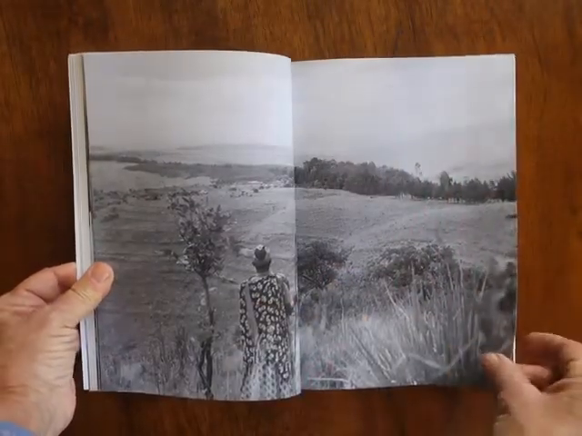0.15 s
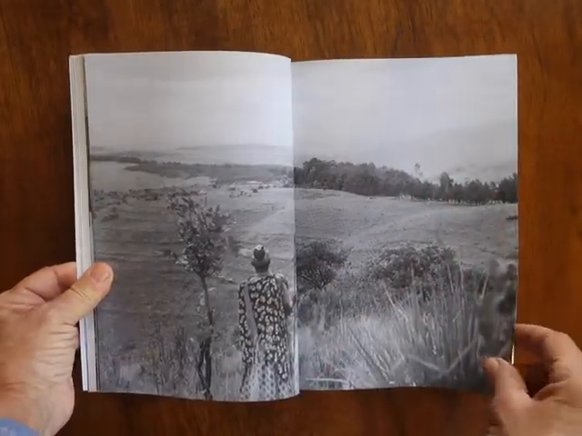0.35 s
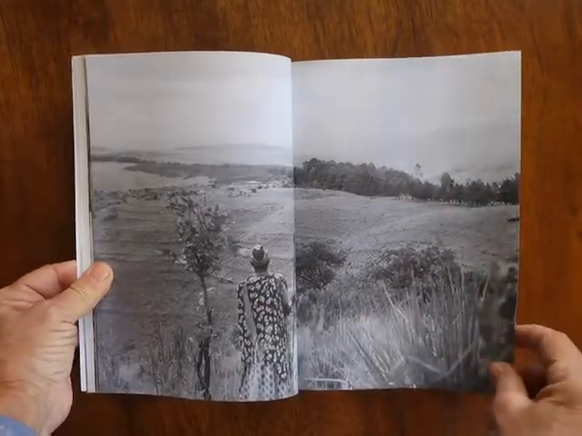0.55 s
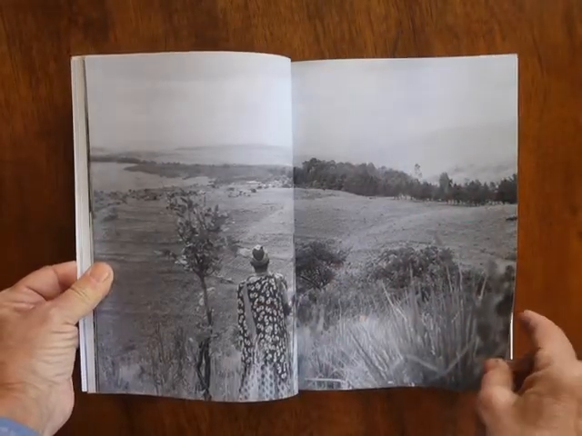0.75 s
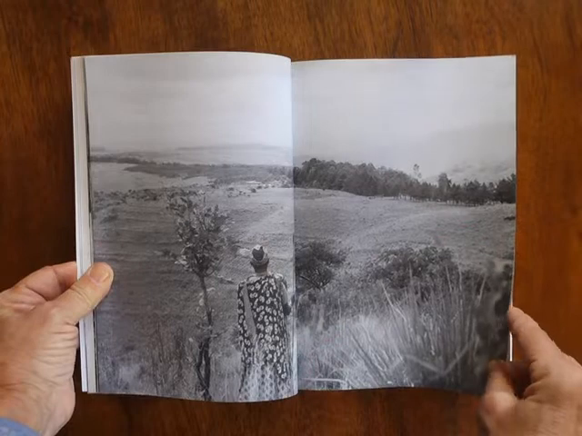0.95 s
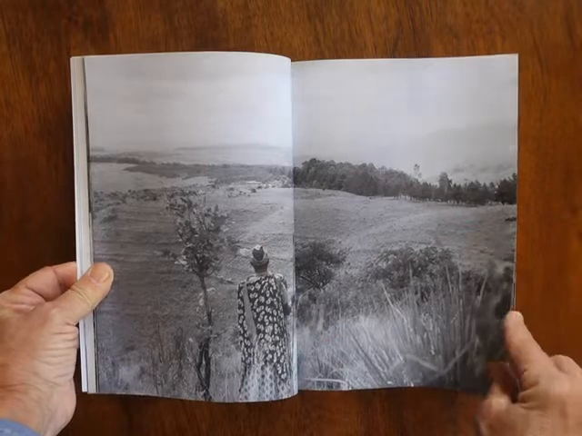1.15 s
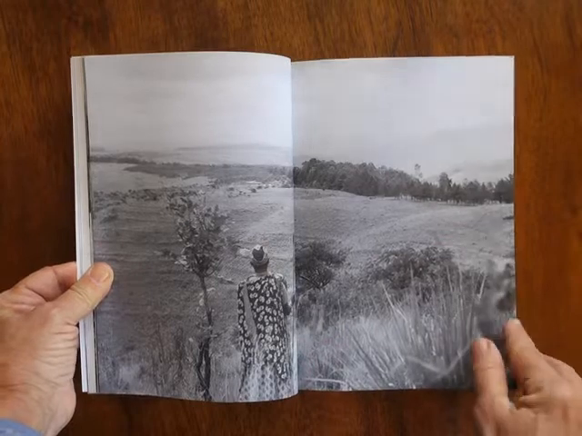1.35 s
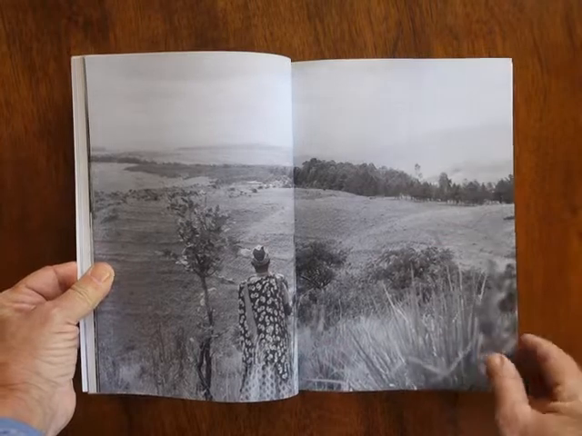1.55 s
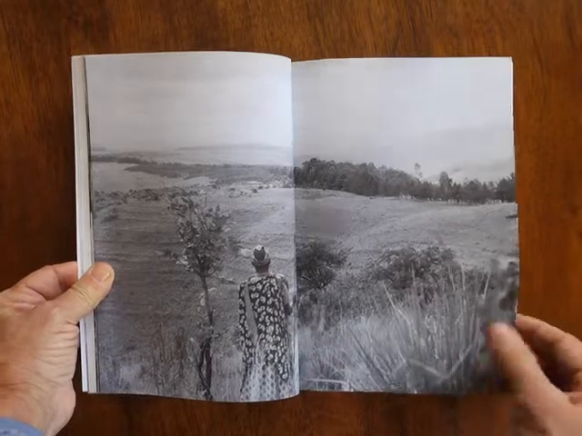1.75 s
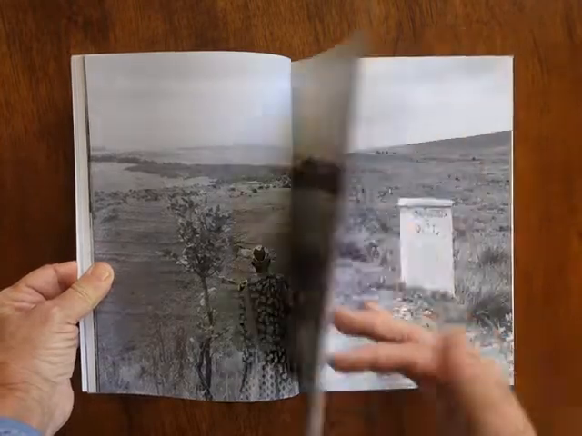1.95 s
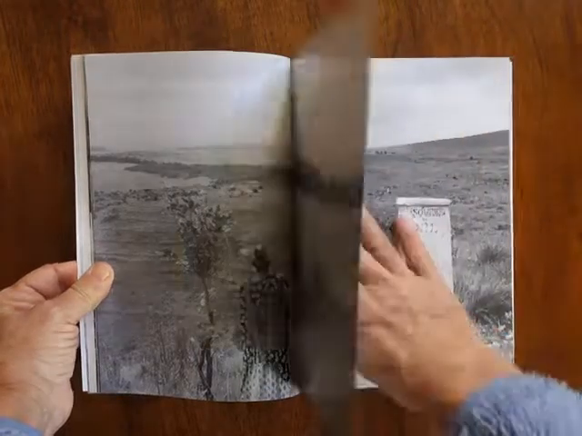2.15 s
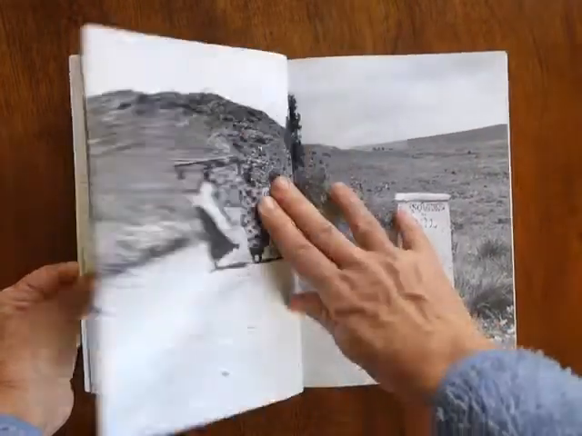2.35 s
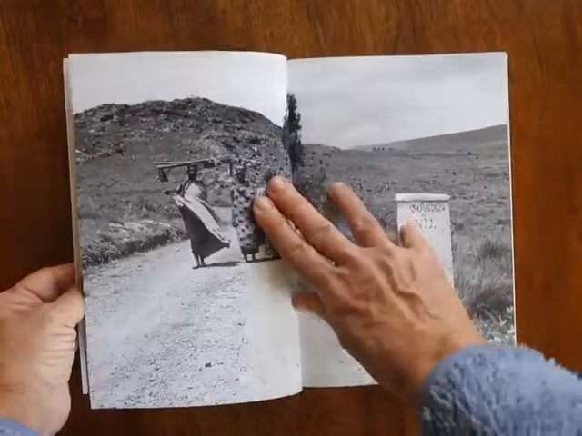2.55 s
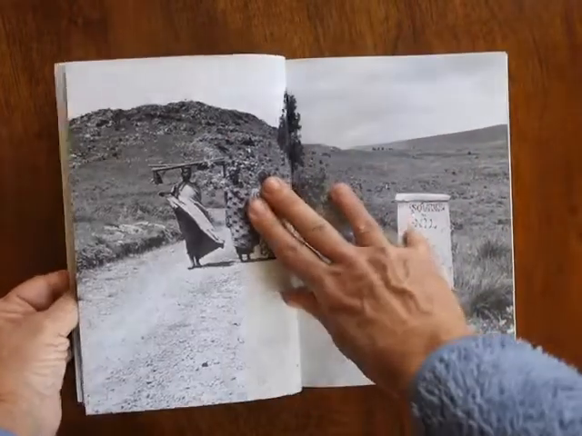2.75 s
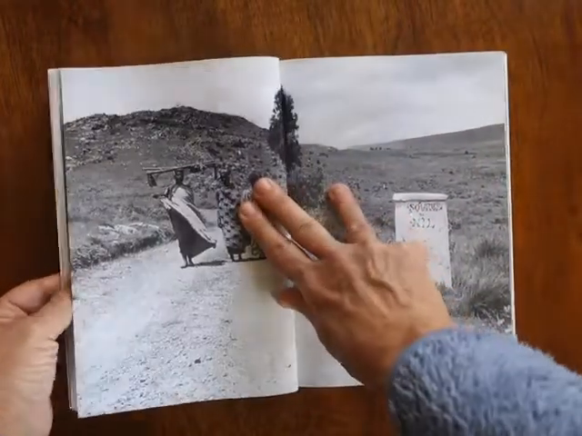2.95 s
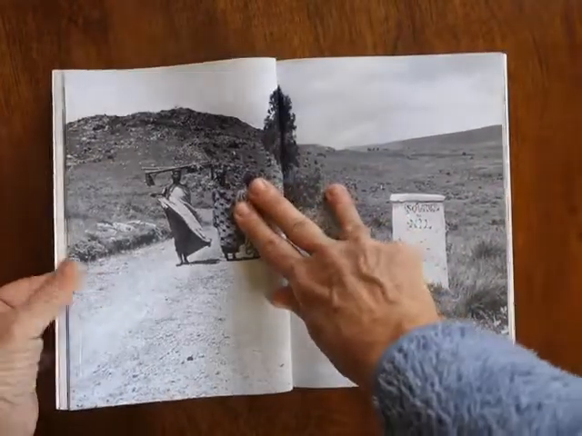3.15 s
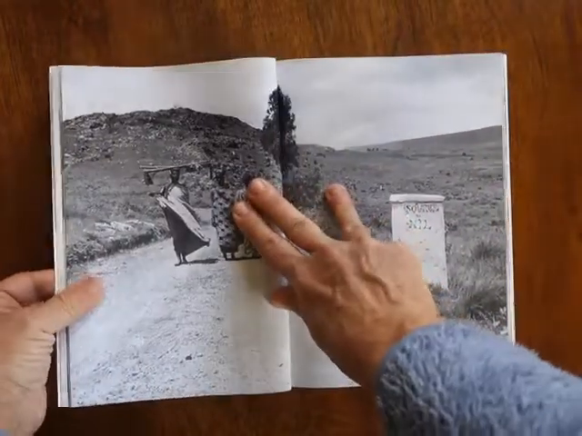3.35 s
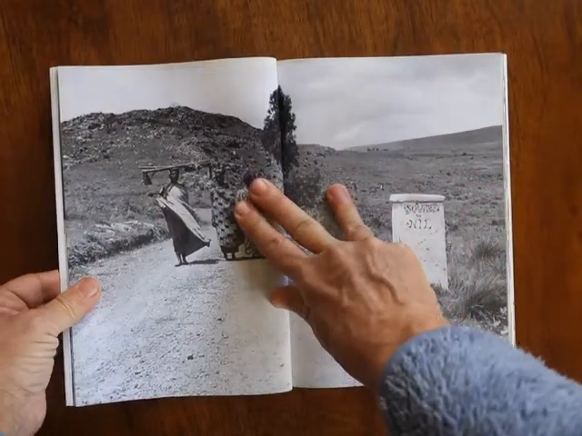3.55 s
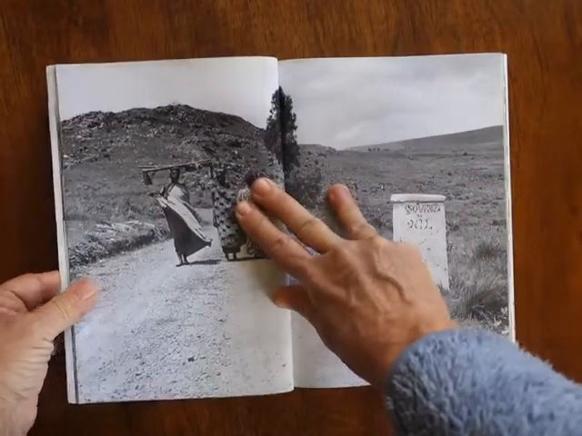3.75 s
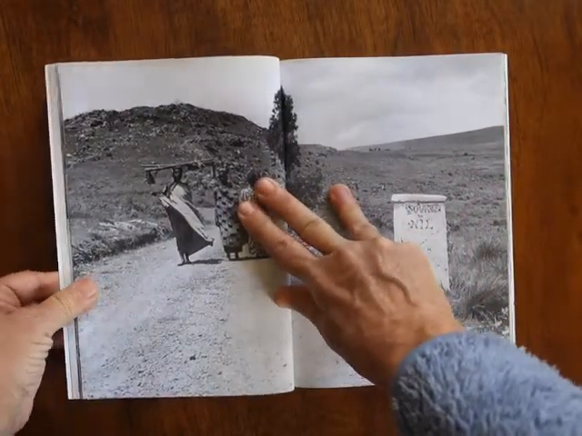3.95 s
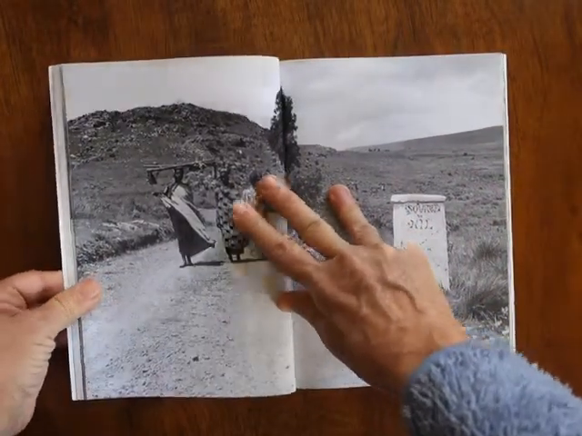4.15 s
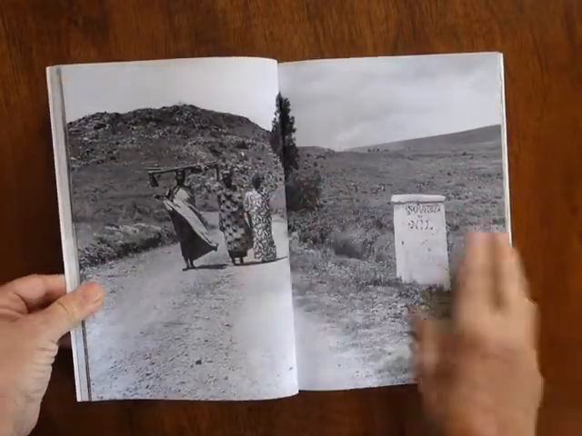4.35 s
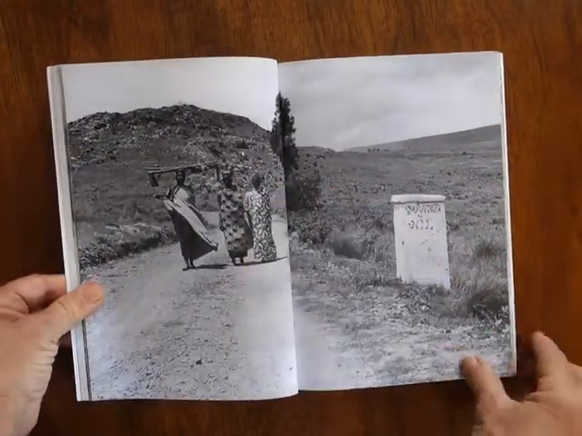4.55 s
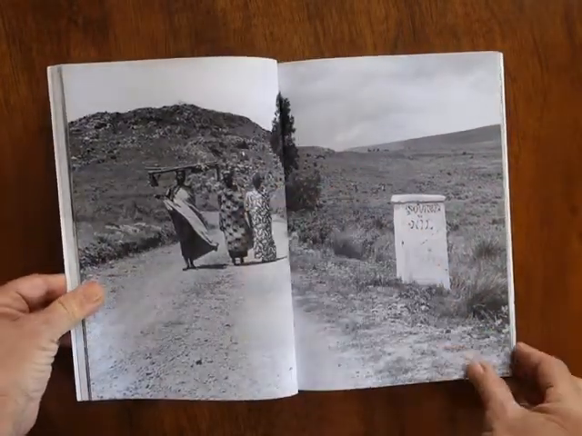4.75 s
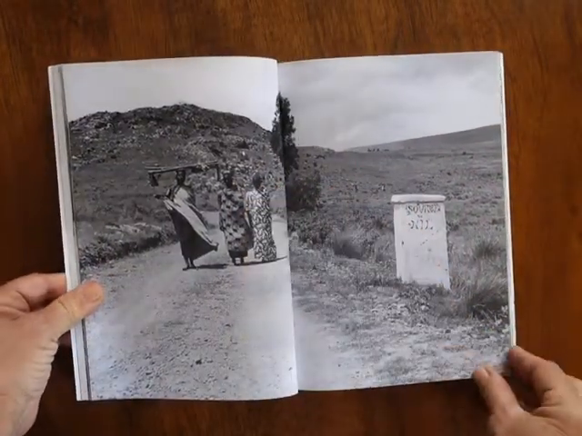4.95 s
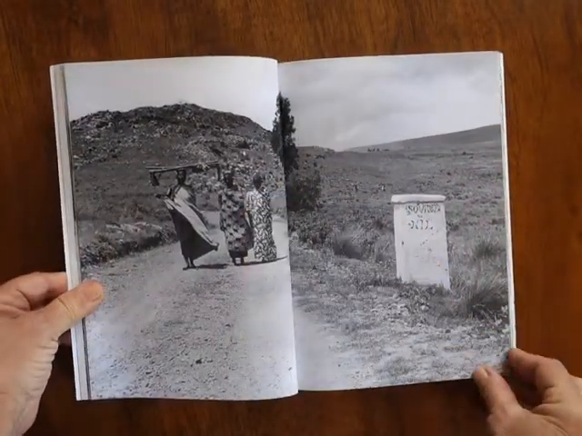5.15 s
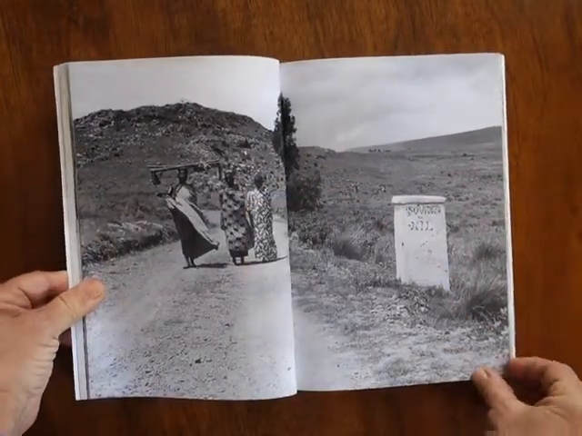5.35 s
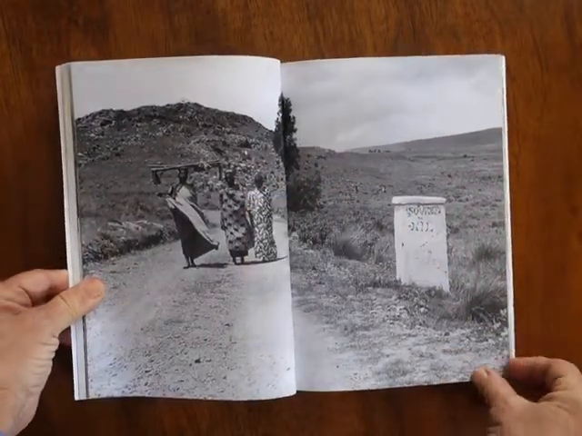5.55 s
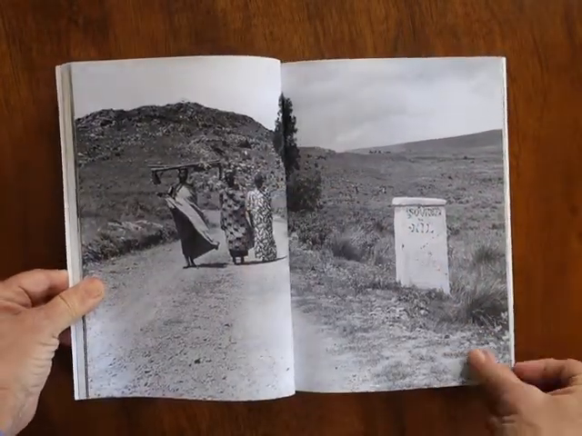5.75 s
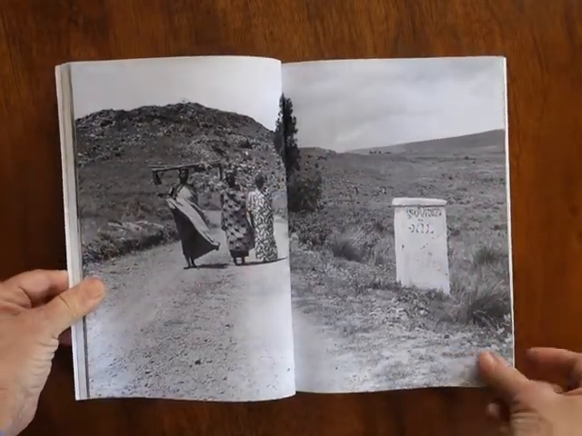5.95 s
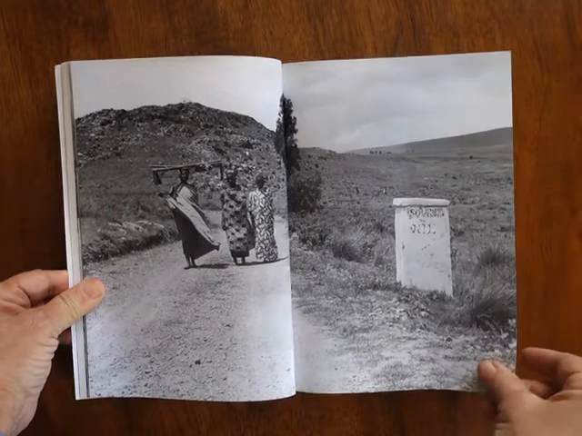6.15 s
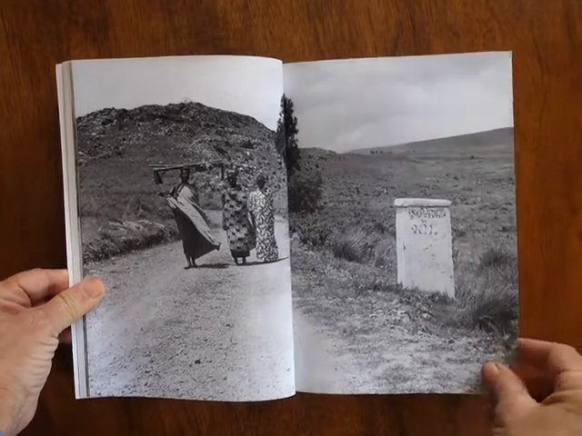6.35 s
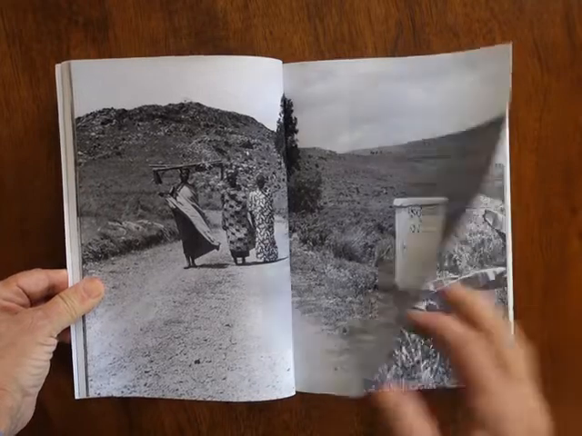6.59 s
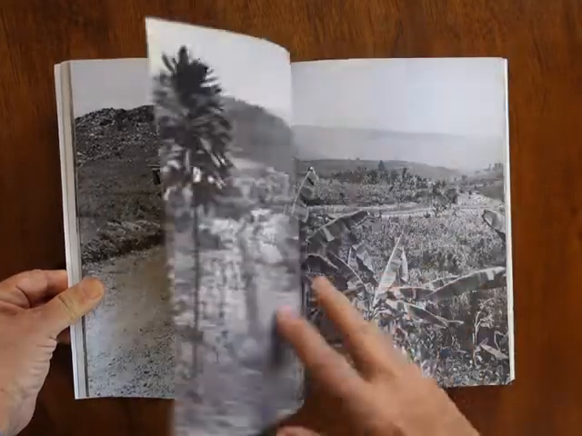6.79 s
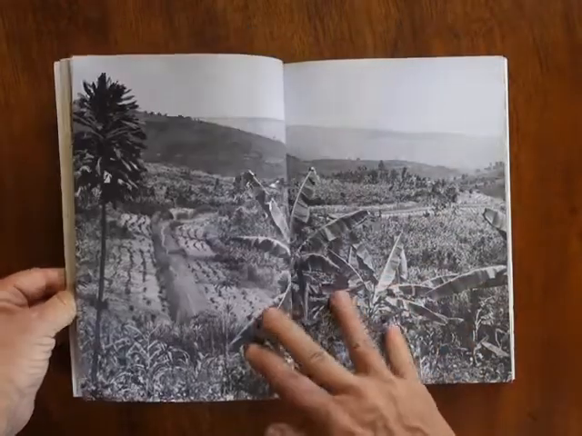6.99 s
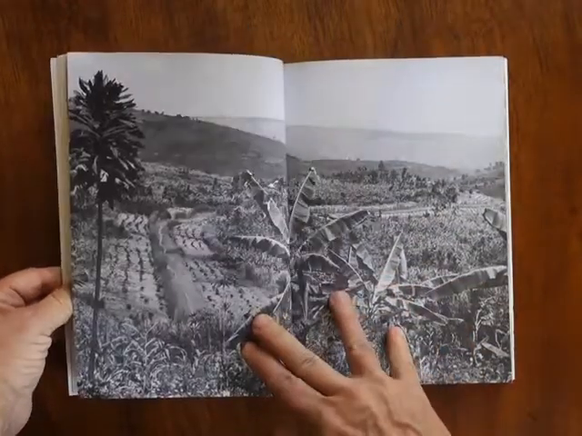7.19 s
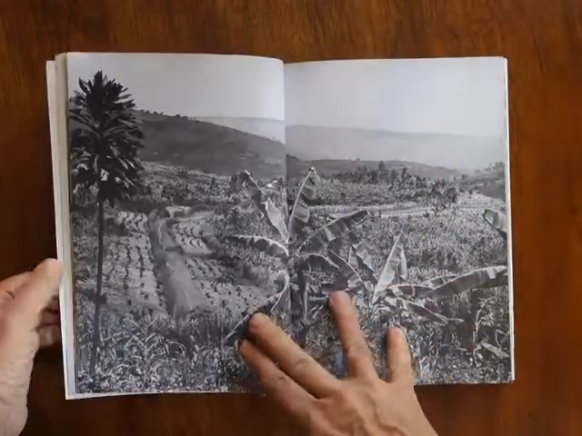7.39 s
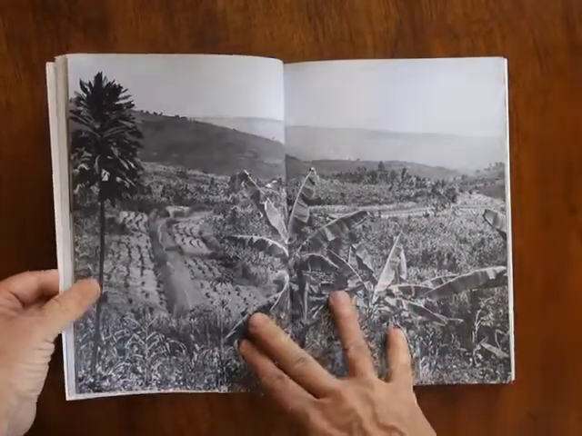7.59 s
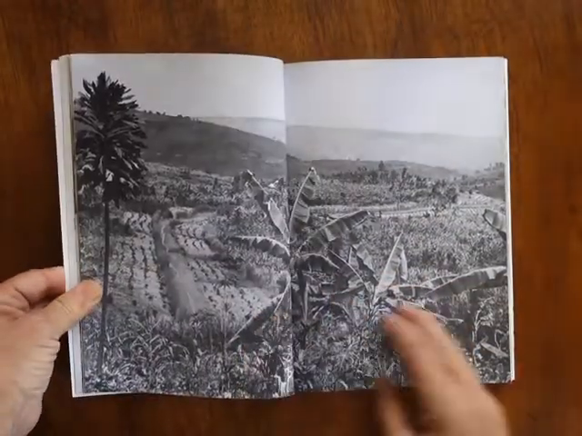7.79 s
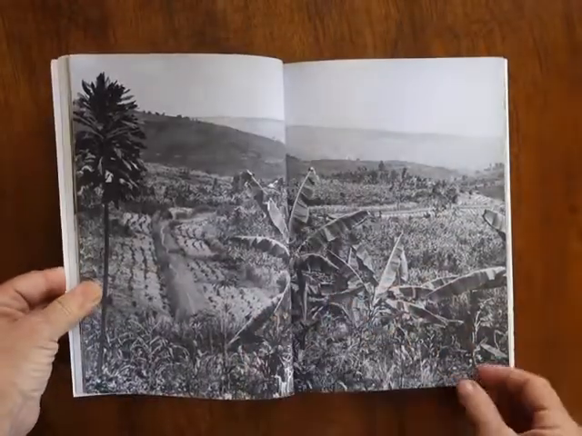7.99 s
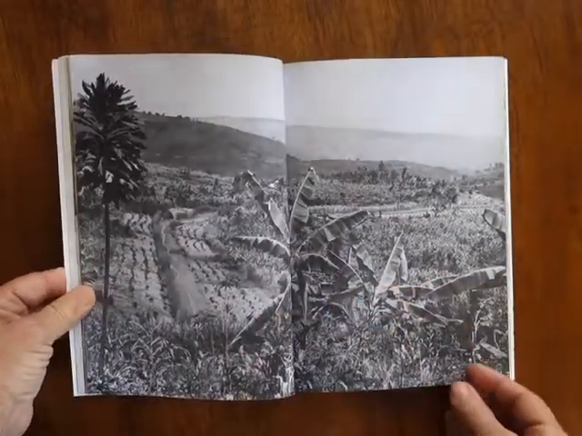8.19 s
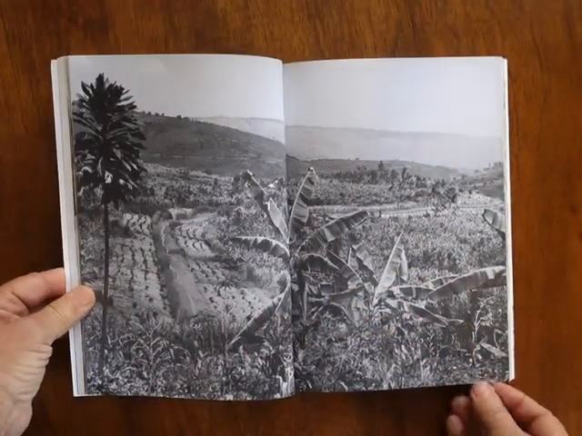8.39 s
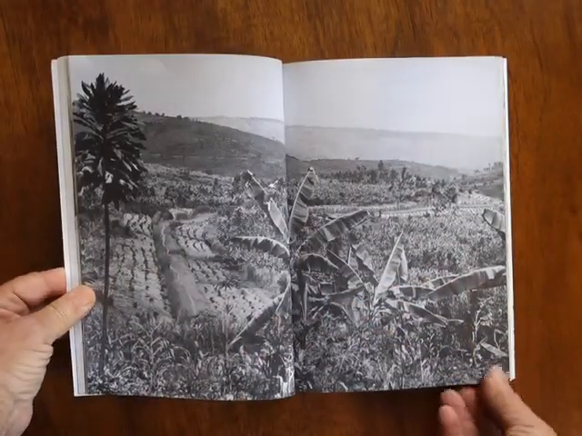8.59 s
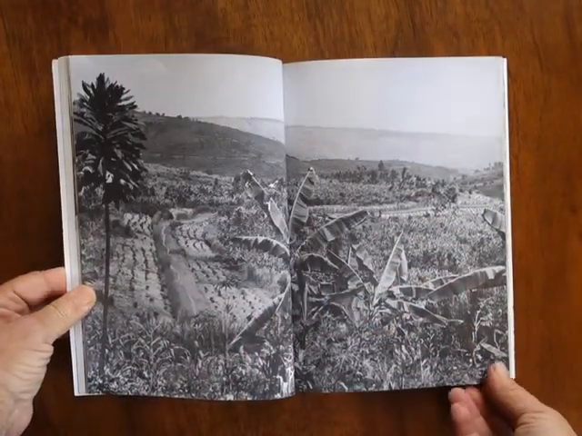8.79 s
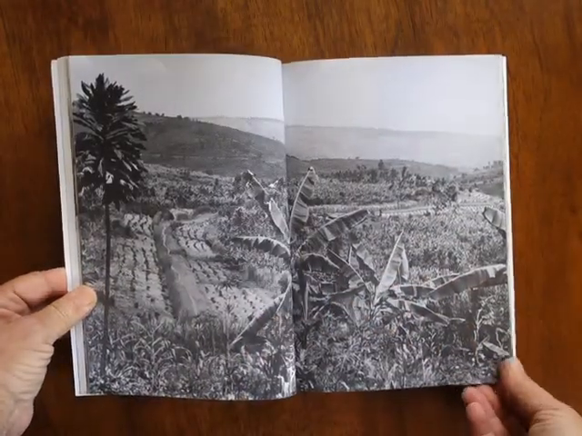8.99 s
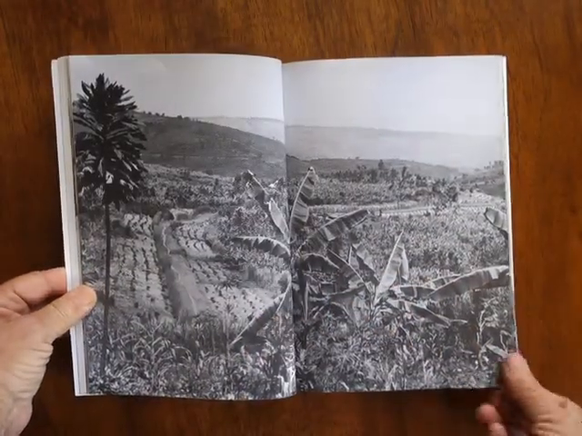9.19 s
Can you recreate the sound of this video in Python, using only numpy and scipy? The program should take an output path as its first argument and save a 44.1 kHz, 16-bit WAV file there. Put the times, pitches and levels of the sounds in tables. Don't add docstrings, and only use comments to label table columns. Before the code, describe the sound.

Close, slightly thin stereo pickup of a softcover book on a wooden table. Fingertips scuff and pop a page corner, then a sheet sweeps over with a broad rustling flap and soft low bump. A hollow knock and crisp snaps follow as the page settles. After a lull, rapid scratchy picking leads to a second, shorter turn, then light ticks and faint slips. Quiet room air and hiss continue underneath.

```python
import sys
import numpy as np
from scipy import signal
from scipy.fft import rfft, irfft, next_fast_len
from scipy.io import wavfile
from scipy.ndimage import uniform_filter1d

SR = 44100
rng = np.random.default_rng(int(sys.argv[2]) if len(sys.argv) > 2 else 0)


def to_wav(sig):
    pcm = np.clip(np.atleast_2d(sig), -1, 1) * 32767
    pcm = np.round(pcm).astype(np.int16)
    wavfile.write(sys.argv[1], SR, pcm.T)


def gain_from_db(level_db):
    decades = np.asarray(level_db, float) / 20
    return 10 ** decades


N = 407043


def unit(x):
    return x / np.sqrt(np.mean(x ** 2) + 1e-20)


def peak(x):
    return x / np.max(np.abs(x))


def along(points, hz):
    f, v = np.transpose(points)
    return np.interp(np.log(hz + 1), np.log(f + 1), v)


def filtered(x, response):
    n = x.shape[-1]
    m = next_fast_len(n + min(n, SR // 4))
    return irfft(rfft(x, m) * response(np.fft.rfftfreq(m, 1 / SR)), m)[..., :n]


def ring(f, hz, width_hz):
    return 1j * f * width_hz / (hz * hz - f * f + 1j * f * width_hz + 1e-9)


def modes(rows):
    return lambda f: sum((-1) ** k * gain_from_db(db) * ring(f, hz, w) for k, (hz, w, db) in enumerate(rows))


def sides(pan_db):
    pan_db = np.clip(pan_db, -16, 3)
    return gain_from_db(np.array([pan_db / 2, -pan_db / 2]))


def add(out, s, sound):
    part = out[:, max(round(s * SR), 0):][:, :sound.shape[1]]
    part += sound[:, :part.shape[1]]


def quiet():
    # (frequency [Hz], level [dB])
    air_colour = [(12, -59.5), (70, -25), (105, -27.5), (219, -23.5), (526, -17), (687, -11.5),
                  (1020, -19.5), (1410, -12.5), (2890, -19), (5610, -22), (10600, -22.5), (11500, -4.5),
                  (15000, -38), (22000, -120)]
    # (frequency [Hz], likeness [-1 to 1])
    alike = [(60, 1), (220, 0.23), (840, 0.14), (3140, 0.08), (11800, 0.072)]
    # (frequency [Hz], left minus right [dB])
    lean = [(60, 14), (220, -2.5), (840, -3.5), (3140, -5.5), (11800, -5)]
    # (frequency [Hz], width [Hz], level [dB])
    casing = [(744, 41, -9.5), (860, 84, 7), (1250, 170, 7.5), (2040, 190, -24.5)]
    turn = lambda f: np.arccos(np.clip(along(alike, f), -1, 1)) / 2
    colour = lambda f: gain_from_db(along(air_colour, f)) * (1 + 0.66 * np.abs(modes(casing)(f)))
    noise = rng.standard_normal((2, N))
    mid, side = filtered(noise, lambda f: colour(f) * [np.cos(turn(f)), np.sin(turn(f))])
    pair = np.array([mid + side, mid - side]) / np.std(mid)
    return gain_from_db(-66.5) * filtered(pair, lambda f: sides(along(lean, f)))


def room(x):
    # (frequency [Hz], time [s])
    fade = [(120, 0.59), (800, 0.62), (2000, 0.51), (5000, 0.29), (10000, 0.099)]
    # (frequency [Hz], level [dB])
    walls = [(120, -4.5), (800, -8.5), (2000, -7), (5000, -10.5), (10000, -9)]
    out = np.zeros_like(x)
    step = 17640
    for k in range(0, N, step):
        hz, t, z = signal.stft(rng.standard_normal((2, SR // 2)), SR, nperseg=256)
        apart = np.clip(hz / 3000, .15, 1)[:, None]
        z = z[0] + apart * np.array([z[1], -z[1]])
        decay_db = along(walls, hz)[:, None] - 60 * t / along(fade, hz)[:, None]
        tail = signal.istft(z * gain_from_db(decay_db), SR, nperseg=256)[1]
        tail = tail / np.linalg.norm(tail[0])
        answer = signal.fftconvolve(x[:, k:k + step].mean(0)[None], tail, axes=1)
        add(out, k / SR + .005, answer)
    return out * sides(-3.0)[:, None]


def table(f):
    # (frequency [Hz], width [Hz], level [dB])
    wood = [(216, 140, -5.5), (236.8, 5.5, 2), (279, 15.5, -1), (360, 42, 2.5), (449, 77, 0.5)]
    return modes(wood)(f)


def book(f):
    # (frequency [Hz], width [Hz], level [dB])
    block = [(470, 150, -8), (599, 74, -3.5), (682, 72, 2.5), (830, 87, 7), (1035, 210, 1), (1149, 250, -1),
             (1780, 410, -11)]
    return modes(block)(f)


def knocks():
    # (time [s], peak level [dB], pitch [Hz], thud level [dB], rattle level [dB])
    blows = [(2.735, -50, 755, -1, -9), (2.929, -15, 822.5, -33.5, -15), (2.9362, -23, 860, -21, -15),
             (3.305, -48.5, 573, -2, -4), (3.644, -40, 940, -7, -1.5), (4.133, -38, 806, -23, -7),
             (4.1407, -33, 860, -13.5, -20), (7.697, -38, 727, -9, -8.5), (8.037, -47.5, 813, -5, -12),
             (8.0735, -53, 850, -11, -11), (8.105, -51, 855, -12, -12.5), (8.1397, -47.5, 830, -11.5, -14),
             (8.176, -48, 826, -16, -12), (8.209, -47, 816, -18, -12), (2.3865, -32, 830, -14.5, -5),
             (1.967, -50, 843, -20, -14), (4.256, -53, 825, -7, -15)]
    # (time [s], level [dB])
    hums = [
        (2.438, -64),
        (2.78, -72),
        (3.357, -68.5),
        (3.66, -70),
        (4.133, -59.5),
        (6.498, -76.5),
    ]
    out, t = np.zeros((2, N)), np.arange(SR // 2) / SR
    for s, db, hz, thud_db, rattle_db in blows:
        pop = np.sin(2 * np.pi * hz * t) * gain_from_db(-60 * t / 0.039)
        pop += 0.35 * np.sin(2 * np.pi * 1.2 * hz * t) * gain_from_db(-60 * t / 0.027)
        pop += 0.29 * np.sin(2 * np.pi * 0.81 * hz * t) * gain_from_db(-60 * t / .03)
        pop *= (1 - np.exp(-t / 0.00067)) ** 2
        shake = rng.standard_normal((2, len(t))) * gain_from_db(-60 * t / np.array([[.3], [.25]]))
        shake *= 1 - np.exp(-t / 0.0026)
        rattle = peak(filtered(shake[0], lambda f: (book(f) + 0.21) * ring(f, hz, 1500)))
        thud = peak(filtered(shake[1], lambda f: table(f) * ring(f, 280, 200)))
        blow = peak(pop) + gain_from_db(rattle_db) * rattle + gain_from_db(thud_db) * thud
        add(out, s + .0012, gain_from_db(db) * np.outer(sides(-2), blow))
    t = np.arange(SR) / SR
    hum_hz, hum_t60 = 123, .9
    for s, db in hums:
        hum = gain_from_db(db - 60 * t / hum_t60) * np.sin(2 * np.pi * hum_hz * t) * (1 - np.exp(-t / 0.012))
        add(out, s, hum * np.ones((2, 1)))
    return out


def grit(spiky_db, patchy_db, alike):
    unevenness = unit(uniform_filter1d(rng.standard_normal(N), size=90))
    slips = rng.standard_normal((2, N)) * gain_from_db(spiky_db * unevenness)
    z = signal.stft(slips, nperseg=256)[2]
    field = uniform_filter1d(rng.standard_normal(z.shape[1:]), size=3, axis=0)
    field = uniform_filter1d(field, size=24, axis=1)
    a, b = signal.istft(z * gain_from_db(patchy_db * unit(field)), nperseg=256)[1][:, :N]
    turn = np.arccos(np.clip(alike, -1, 1)) / 2
    return np.cos(turn) * a + np.sin(turn) * np.array([b, -b])


def swells(rows, rest_db):
    swell_db = 20
    t = np.arange(0, N, 64) / SR
    s, rise, fall, db, over_db = np.transpose(rows)[..., None]
    first = gain_from_db(db - swell_db * np.where(t < s, (s - t) / rise, (t - s) / fall))
    second = first * gain_from_db(over_db)
    both = [np.sqrt((g ** 2).sum(axis=0) + gain_from_db(r) ** 2) for g, r in zip((first, second), rest_db)]
    return [np.interp(np.arange(N) / SR, t, g) for g in both]


def slide():
    # (peak time [s], rise [s], fall [s], flap level [dB], table pressed over the flap [dB])
    presses = [(.28, 2.5, 0.52, -67.5, -6.5), (.59, 1.5, 4.4, -66.5, -13), (1.39, 0.59, 0.37, -65, -4.5),
               (2.2, 0.34, 0.85, -50.5, -12.5), (2.395, 0.067, 0.12, -41.5, -8), (2.65, .4, 0.14, -58, -4),
               (2.9, 0.52, 0.25, -71, 11), (3.11, .3, 0.54, -61, -18), (3.42, 0.4, 0.4, -65, -3.5),
               (3.78, 0.68, 1.4, -65, -9), (4.16, 0.13, 0.31, -58, -18), (4.3, 0.33, 0.44, -67, 4),
               (4.62, 0.43, 1.26, -68, -8), (5.3, 0.079, 0.54, -72, 2), (5.55, 0.32, 0.27, -83, 12),
               (6.45, 0.063, 1.7, -65, -6.5), (6.66, .55, 1.3, -67, -8), (6.97, 0.27, 0.25, -54, -5.5),
               (7.43, 0.23, 0.22, -62, -13), (7.92, 0.48, 1.4, -64.5, -6), (8.15, 0.29, 0.16, -65, -4)]
    # (peak time [s], rise [s], fall [s], rustle level [dB], edge hiss over the rustle [dB])
    glides = [(.29, 0.35, 0.6, -53.5, -14), (.6, 1, .7, -64.5, -4), (1.0, 0.17, 1, -60, -13.5),
              (1.39, 0.21, 0.47, -57, -4.5), (1.85, 0.3, 0.25, -54, -16), (1.975, 0.017, 0.83, -51, -6),
              (2.05, 0.14, 0.69, -62, -7), (2.15, 0.16, 0.31, -56, 9.5), (2.24, 0.24, 0.14, -57.5, 10.5),
              (2.31, 0.22, 0.1, -46, -3), (2.393, .03, 0.16, -39, -31), (2.65, 0.48, 0.13, -57, -14),
              (2.95, 0.055, 0.42, -56.5, -8), (3.45, 0.15, 0.29, -60.5, -27),
              (3.7, 0.13, 0.35, -52.5, -12.5), (4.4, 0.24, 0.29, -61, 4), (5.31, 0.095, 0.26, -64, -12),
              (6.14, 0.19, 1, -69, 6), (6.45, 0.047, 0.59, -48.5, -9), (6.66, 0.42, 0.056, -48.5, -7.5),
              (6.94, 0.38, 0.17, -53, -2.5), (7.01, 0.12, 0.16, -51.5, -5), (7.2, 0.33, 1, -68, -6),
              (7.81, 0.24, 0.19, -62.5, 4), (7.89, 0.54, 0.25, -65, -22), (8.2, 0.48, 0.27, -58, -5)]
    # (frequency [Hz], level [dB])
    rustle_colour = [(530, -22), (900, -28.5), (1020, 5), (1610, 3), (2100, 6), (3200, 1), (4330, -3.5),
                     (6000, -40), (7800, -40), (13200, -120)]
    # (frequency [Hz], level [dB])
    hiss_colour = [(2060, -19), (3500, -2), (5760, 1), (6990, 1.5), (9520, -3.5), (11300, -0.5),
                   (11500, -12), (15000, -57), (22000, -120)]
    # (press [dB], flap [dB], rustle [dB], hiss [dB])
    rest_db = (-88, -79, -80, -78)
    flapping, pressing = swells(presses, (rest_db[1], rest_db[0]))
    rustling, hissing = swells(glides, rest_db[2:])
    press = grit(spiky_db=.6, patchy_db=2.5, alike=0.95)
    press = unit(filtered(press, lambda f: table(f) * ring(f, 340, 350) ** 2))
    flap = grit(spiky_db=2.5, patchy_db=2.5, alike=0.85)
    flap = unit(filtered(flap, lambda f: book(f) * ring(f, 720, 1800)))
    rustle = grit(spiky_db=2.2, patchy_db=2.4, alike=0.6)
    rustle = unit(filtered(rustle, lambda f: gain_from_db(along(rustle_colour, f))))
    hiss = grit(spiky_db=2.2, patchy_db=2.2, alike=0.3)
    hiss = unit(filtered(hiss, lambda f: gain_from_db(along(hiss_colour, f))))
    treble = gain_from_db(-3.5) * rustling * rustle + hissing * hiss
    return pressing * press + flapping * flap * sides(-0.57)[:, None] + treble * sides(-7.5)[:, None]


def hand(s):
    # (time [s], left minus right [dB])
    path = [(0, -13), (.3, -14), (.5, -15), (.66, -11.5), (1.7, -16.5), (2.2, -7), (3.6, -7.5), (4.2, -7.5),
            (6.1, -13), (6.6, -10.5), (6.9, -6.5), (7.8, -11), (8.05, -9), (9.23, -5.5)]
    return np.interp(s, *np.transpose(path))


def sheet_modes(depth_db):
    knots = rng.standard_normal(64)
    return lambda f: gain_from_db(depth_db * np.interp(f, np.linspace(0, SR / 2, len(knots)), knots))


def scuffs():
    # (middle time [s], rms level [dB], centre [Hz], length [s])
    drags = [(.109, -56, 3100, 0.0087), (0.17, -43.5, 2300, 0.0074), (.186, -42, 2800, 0.012),
             (.268, -42.5, 2370, 0.011), (.274, -45.5, 3900, .02), (.282, -43.5, 2450, 0.018),
             (.386, -54.5, 8800, 0.0059), (.308, -40.5, 2300, 0.018), (0.28, -55, 3800, 0.017),
             (.352, -47, 2400, 0.0063), (.548, -53, 2170, 0.014), (1.499, -56, 3850, 0.038),
             (1.541, -51.5, 5230, 0.031), (1.762, -58.5, 4800, 0.046), (1.829, -58, 4200, 0.079),
             (2.023, -49, 5600, 0.051), (6.091, -42, 6100, 0.013), (6.099, -41, 4500, 0.013),
             (6.111, -44, 3040, 0.02), (6.136, -46.5, 3400, .008), (6.214, -42, 4100, 0.0084),
             (6.872, -56, 3400, .012), (6.897, -47, 3700, 0.01), (7.5, -59, 3400, 0.007),
             (2.391, -44.5, 4000, 0.01), (6.445, -52, 4100, .008), (6.13, -52.5, 2800, 0.025),
             (6.197, -49, 2900, 0.012), (6.214, -42, 2450, 0.015), (6.239, -45.5, 2700, 0.0085),
             (6.24, -47, 4800, 0.0079), (6.274, -45.5, 1850, 0.0085), (6.273, -47, 4700, 0.0086),
             (6.484, -46, 4330, 0.0029), (6.618, -38.5, 2270, 0.012), (6.629, -40, 2300, .008),
             (6.484, -41, 1800, 0.0045), (6.525, -56, 4100, .035), (6.562, -53, 4200, 0.038),
             (6.6, -52, 2100, 0.022), (2.402, -49, 2200, .03), (8.05, -53.5, 3300, 0.015),
             (8.25, -61.5, 4700, 0.023), (8.282, -63, 4400, 0.018), (6.645, -41, 2000, 0.0037),
             (6.323, -44, 2160, 0.011), (6.376, -45.5, 3300, 0.0088), (1.362, -49, 2000, 0.023),
             (7.862, -51, 5900, 0.04), (7.974, -61, 4800, 0.017), (8.48, -60, 4300, 0.0065)]
    # (middle time [s], rms level [dB], centre [Hz], length [s])
    scrapes = [(.205, -44.5, 3670, 0.013), (.624, -53, 2200, 0.033), (.988, -49, 2780, 0.013),
               (1.169, -54.5, 4140, 0.028), (1.362, -43, 5600, 0.0053), (1.663, -63.5, 1910, 0.0096),
               (1.796, -54.5, 2300, 0.022), (2.597, -56, 3600, 0.059), (3.43, -64.5, 3000, 0.042),
               (4.412, -53.5, 7700, 0.019), (5.308, -66.5, 4930, 0.066), (5.904, -65.5, 4100, 0.018),
               (6.472, -45.5, 5100, 0.023), (6.562, -48, 2010, 0.023), (6.845, -55.5, 3440, 0.16),
               (7.004, -49.5, 1290, 0.044), (7.0, -52.5, 4220, 0.036), (6.95, -52, 4040, 0.054),
               (7.382, -58, 2200, 0.029)]
    # (middle time [s], rms level [dB], centre [Hz], length [s])
    flaps = [(.455, -52, 1110, 0.035), (2.182, -37.5, 827, 0.042), (2.223, -42.5, 720, 0.1),
             (2.294, -37, 1420, 0.013), (2.31, -43, 895, 0.044), (2.418, -44.5, 510, 0.073),
             (2.445, -43.5, 1000, 0.03), (2.408, -41, 820, .012), (2.426, -42, 948, .02),
             (2.761, -57, 600, 0.082), (3.322, -55.5, 710, 0.0032), (3.414, -64, 530, 0.081),
             (3.837, -54, 960, 0.031), (4.165, -60, 1580, 0.093), (6.525, -49.5, 1250, 0.036),
             (6.632, -39, 850, 0.0096), (6.664, -50, 890, 0.034), (6.905, -41, 1050, 0.0086),
             (6.922, -47, 1400, 0.018), (6.866, -49.5, 695, 0.0055), (4.148, -57, 1700, 0.014)]
    # rows, bright edge [dB], broad part of the rasp over its sharp centre
    kinds = ((drags, -20.5, 0.87), (scrapes, -7, 1.5), (flaps, -39, 0.67))
    out, lead = np.zeros((2, N)), 2048
    t = (np.arange(6144) - lead) / SR
    for s, db, hz, length, edge_db, spread in [(*r, *kind) for rows, *kind in kinds for r in rows]:
        pan_db = hand(s)
        u = t / max(length, .002)
        stroke = np.exp(-np.where(u < 0, 4.5, 2.2) * np.abs(u) ** 1.76)
        noise = rng.standard_normal((2, len(t)))
        a, b = noise * gain_from_db(1.6 * unit(uniform_filter1d(rng.standard_normal(len(t)), size=60)))
        rasp = filtered(a + 0.23 * np.array([b, -b]), sheet_modes(depth_db=4.0))
        centre = lambda f: ring(f, hz, .25 * hz) ** 2 + spread * ring(f, hz, 1.28 * hz) ** 2
        sheet = unit(filtered(rasp, lambda f: centre(f) / (1 + (f / (1.97 * hz)) ** 6)))
        edge = unit(filtered(rasp, lambda f: ring(f, 8160, 4600) ** 2))
        shade = min(hz / 2500, 1)
        sound = sides(shade * pan_db)[:, None] * sheet + gain_from_db(edge_db) * sides(pan_db)[:, None] * edge
        add(out, s - lead / SR, gain_from_db(db) * stroke * sound)
    return out


def riffles():
    # (first time [s], gap [s], pages)
    runs = [(3.672, .014, 3)]
    # (peak level [dB], ring [Hz], body level [dB])
    page_ticks = [(-38.5, 4000, -10)]
    scatter_db, edge_db = 1.5, -3
    rows = []
    for (first, gap, pages), (db, hz, body_db) in zip(runs, page_ticks):
        for k in range(pages):
            rows.append((first + k * gap, db + scatter_db * rng.standard_normal(), hz, body_db, edge_db))
    return rows


def snaps():
    # (time [s], peak level [dB], ring [Hz], body level [dB])
    buckles = [(0.1138, -38.5, 2110, -15), (0.1518, -34, 2480, -8.5), (.3859, -25.5, 2450, -11),
               (.3886, -31.5, 2770, -18), (.429, -27, 2040, -10), (0.6648, -29.5, 2040, -20.5),
               (.789, -26, 1400, -14.5), (1.9682, -39, 3440, -10.5), (2.0355, -34, 4100, -10),
               (2.092, -32.5, 4000, -27), (2.3865, -27, 3500, -12), (2.9386, -37, 5100, 12.5),
               (3.6197, -21, 2340, -22), (6.32, -26.5, 2050, -39), (6.3729, -32.5, 2050, -45),
               (6.6422, -28.5, 2640, -7), (6.8924, -24.5, 1320, -21), (6.9945, -33, 1500, -16),
               (7.0035, -40, 1650, -4), (6.5555, -34, 2040, -7), (8.0385, -36.5, 1900, -12),
               (6.1925, -47, 2380, -22), (6.2325, -39, 2000, -20)]
    # (time [s], peak level [dB], ring [Hz], body level [dB])
    ticks = [(.0308, -45.5, 2350, -12), (0.051, -49.5, 1270, -8), (6.9607, -43, 2300, -12),
             (6.9922, -40, 6500, -20), (1.187, -38.5, 1280, -3.5), (1.3281, -40.5, 4440, -20),
             (3.0783, -42, 3900, -4), (3.1972, -45.5, 4600, -15), (3.6428, -23, 2360, -26),
             (3.6585, -29, 2850, -28), (3.7262, -44.5, 7900, -3), (3.9464, -56, 1250, -4),
             (4.0617, -54, 4740, -21), (4.1407, -35.5, 1600, -1), (6.5097, -36.5, 1380, -5.5),
             (7.5677, -50, 4920, -18), (7.6803, -49, 5650, -3), (7.702, -45.5, 1450, -22),
             (8.0385, -31.5, 5130, -27), (4.217, -47.5, 9000, -19)]
    # (time [s], peak level [dB], ring [Hz], body level [dB])
    slips = [
        (8.0737, -42.5, 3000, -11.5),
        (8.105, -41, 3800, -16.5),
        (8.14, -43.5, 4300, -6),
        (8.175, -52, 3000, -7),
        (8.2085, -45, 2600, -5),
    ]
    kinds = ((buckles, -40), (ticks, -5), (slips, -2))  # rows, bright edge [dB]
    rows = [(*r, edge_db) for kind, edge_db in kinds for r in kind]
    out, t = np.zeros((2, N)), np.arange(2048) / SR
    push = (t == t[30]) * rng.choice([-1, 1])
    echo = lambda f: 1 + 0.42 * np.exp(-2j * np.pi * f * 0.0033) / (1 + (f / 5000) ** 2)
    for s, db, hz, body_db, edge_db in rows + riffles():
        pan_db = hand(s)
        tear = rng.standard_normal((2, len(t)))
        after = .022 * tear[1] * gain_from_db(-60 * t / .07)
        crack = push + 0.11 * tear[0] * gain_from_db(-60 * t / 0.015) + after
        crack = filtered(crack, echo)
        paper = lambda f: ring(f, hz, 0.66 * hz) ** 2 + 0.52 * ring(f, hz, 1.5 * hz) ** 2
        sheet = peak(filtered(crack, paper))
        edge = peak(filtered(crack, lambda f: ring(f, 7000, 6500) ** 2))
        body = peak(filtered(crack, lambda f: book(f) * ring(f, 990, 2000)))
        treble = np.outer(sides(pan_db), sheet + gain_from_db(edge_db) * edge)
        low = np.outer(sides(0.18 * pan_db), body)
        add(out, s, gain_from_db(db) * (treble + gain_from_db(body_db) * low))
    return out


def scene():
    hits = snaps() + scuffs() + knocks()
    answer = filtered(room(hits), lambda f: 1 + 0.16 * ring(f, 750, 60))
    return hits + slide() + gain_from_db(-9.5) * answer + quiet()


def band_limit(x):
    return signal.sosfilt(signal.butter(12, 12360, fs=SR, output="sos"), x)


def record(dry):
    # (frequency [Hz], width [Hz], level [dB])
    port_rows = [(1520, 17, -29.5), (2050, 31, -23), (2680, 58, -14), (4350, 740, -6.5), (5600, 150, -8.5)]
    port = lambda f: 1 + sum(gain_from_db(db) * ring(f, hz, w) for hz, w, db in port_rows)
    bass_cut = lambda f: (1j * f / (90 + 1j * f)) ** 2
    top_cut = lambda f: np.clip((11200 - f) / 500, .03, 1)
    thin = filtered(dry, lambda f: port(f) * bass_cut(f) * top_cut(f))
    return band_limit(thin)


dry = scene()
out = record(dry)
to_wav(out)
```